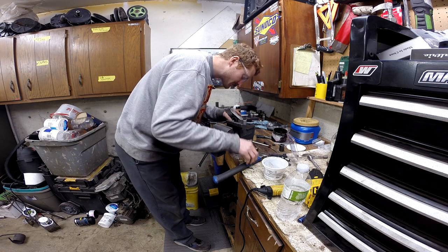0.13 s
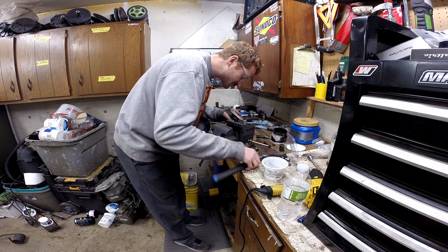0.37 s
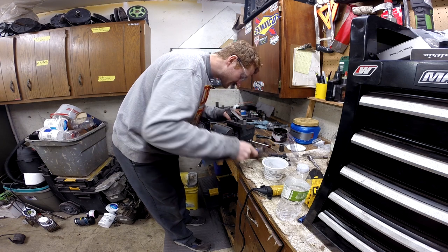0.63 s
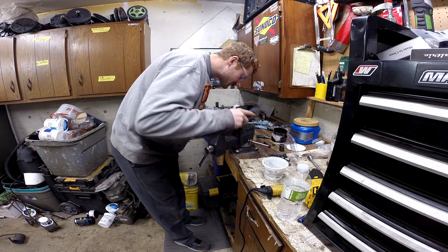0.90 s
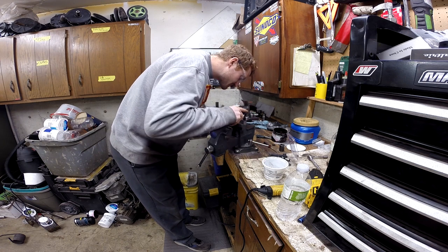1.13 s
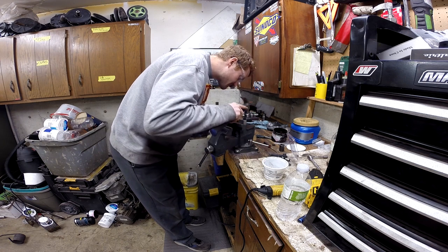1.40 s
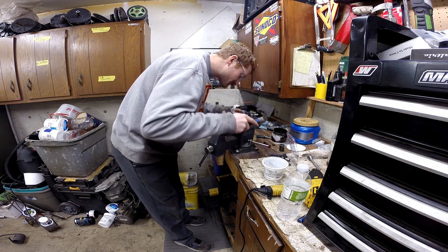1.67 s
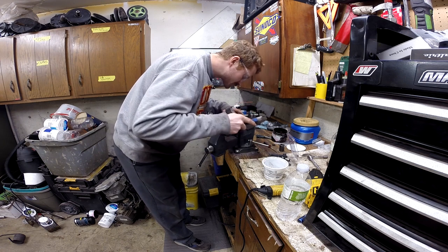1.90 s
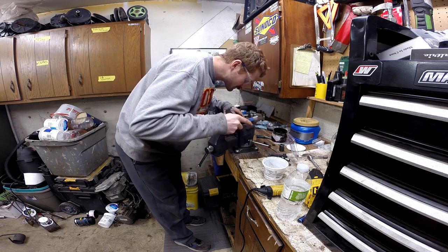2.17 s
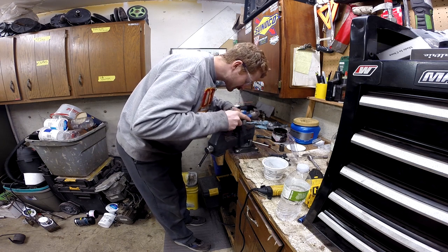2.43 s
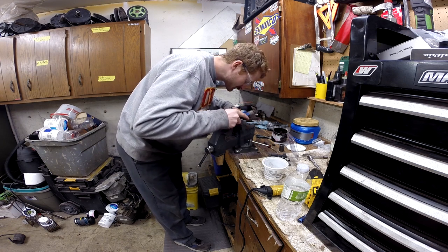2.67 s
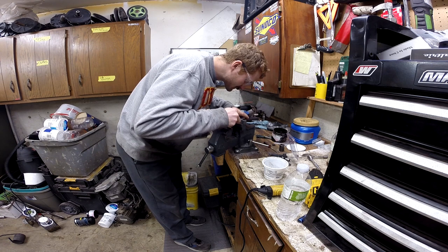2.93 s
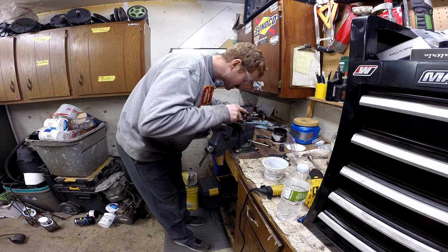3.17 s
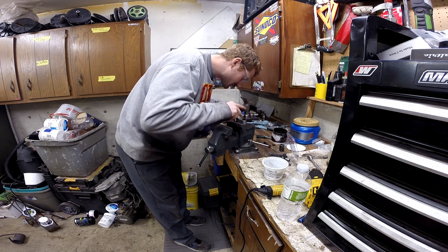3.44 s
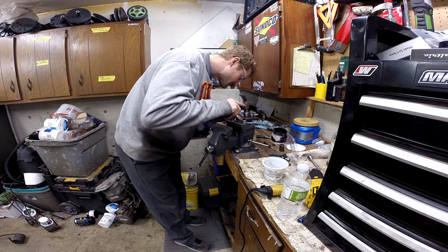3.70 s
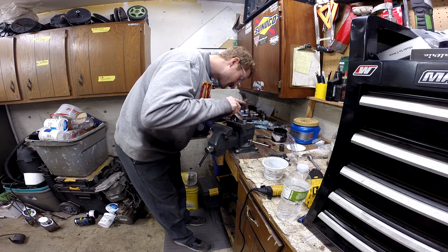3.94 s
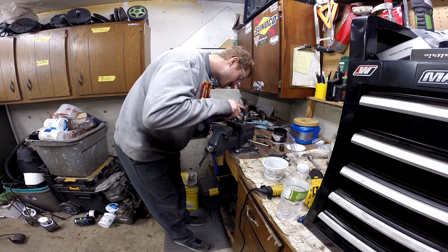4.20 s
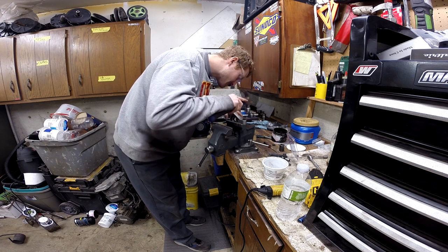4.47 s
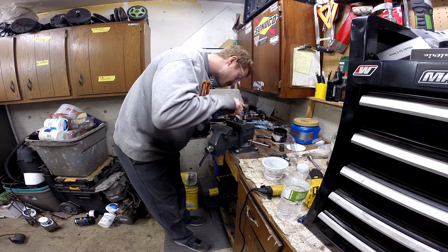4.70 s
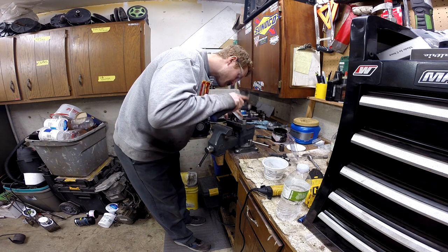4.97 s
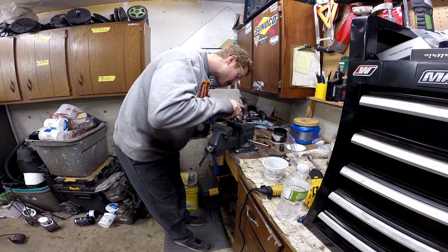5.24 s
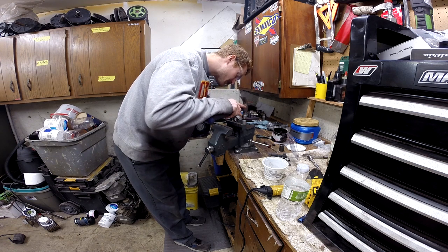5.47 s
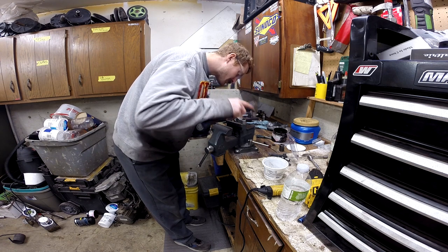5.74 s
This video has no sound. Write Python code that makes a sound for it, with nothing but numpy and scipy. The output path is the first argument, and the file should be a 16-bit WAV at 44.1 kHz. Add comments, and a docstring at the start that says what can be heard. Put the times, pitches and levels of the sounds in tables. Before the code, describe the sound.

Small knocks and a brief scrape as a steel tool is handled and set down on a bench, then three hard, evenly spaced hammer blows ring.

```python
"""Hammering at a garage workbench

Over steady microphone hiss a steel tool is picked up, dragged and set down, then three hammer blows
land on a part held in a vice. Shaped noise makes the clatter and the cluttered garage's answer, short
coloured pulses make the knocks and the bench boom, decaying sines make the ringing steel and the bench
hum, and random slips make the drag.
"""
import sys
import numpy as np
from scipy import signal
from scipy.fft import rfft, irfft
from scipy.io import wavfile

SR = 44100
rng = np.random.default_rng(int(sys.argv[2]) if len(sys.argv) > 2 else 0)


def volts_from_db(level):
    """Convert decibel levels to linear amplitude ratios."""
    exponent = np.asarray(level, float) / 20
    return 10 ** exponent


def put_to_file(sound):
    """Save the sound as 16-bit audio at rate SR, in the file named by the first command-line argument."""
    columns = np.atleast_2d(sound).T  # one column per channel
    safe = np.clip(columns, -1, 1)
    whole_steps = np.round(safe * 32767)
    wavfile.write(sys.argv[1], SR, whole_steps.astype(np.int16))


N = 258426
TOP_HZ = 15350
THIRDS_HZ = 32 * 2 ** np.arange(0, 9, 1 / 3)


def seconds(length_s):
    """Time axis [s]."""
    return np.arange(int(length_s * SR)) / SR


def on_log_axis(hz, points_hz, values):
    """Interpolates values over log frequency."""
    return np.interp(np.log(np.maximum(hz, 1)), np.log(points_hz), values)


def fade(t, t60_s):
    """Exponential decay, 60 dB per t60_s."""
    return np.exp(-np.log(1000) * t / t60_s)


def swell(t, rise):
    """Smooth onset from 0 to 1; t and rise in the same unit."""
    return 1 - np.exp(-(t / rise) ** 2)


def unit(x):
    """Scales to unit energy."""
    return x / np.sqrt(np.sum(x ** 2))


def band(x, hz, octaves):
    """Band-pass around hz."""
    edges_hz = np.clip(hz * 2.0 ** np.array([-octaves / 2, octaves / 2]), 10, .45 * SR)
    return signal.sosfilt(signal.butter(2, edges_hz, "bandpass", fs=SR, output="sos"), x)


def noise_burst(t, t60_s, hz, octaves):
    """Band-passed decaying noise of unit energy."""
    return unit(band(rng.standard_normal(len(t)) * fade(t, t60_s), hz, octaves))


def modes(table, length_s):
    """Response of an object to one tap: a decaying sine per mode."""
    t = seconds(length_s)
    hz, db, t60_s = np.transpose(table)[:, :, None]
    return np.sum(volts_from_db(db) * fade(t, t60_s) * np.sin(2 * np.pi * hz * t), axis=0)


def causal(colour, size=4096):
    """The shortest pulse with this spectrum, from the folded cepstrum; unit energy."""
    db = on_log_axis(np.fft.rfftfreq(size, 1 / SR), *np.transpose(colour))
    cepstrum = irfft(np.log(volts_from_db(db)))
    cepstrum[1:size // 2] *= 2
    cepstrum[size // 2 + 1:] = 0
    return unit(irfft(np.exp(rfft(cepstrum))))


def power_sum(hz, *parts):
    """Spectra of unrelated vibrations, each (table, dB), added as power."""
    power = sum(volts_from_db(db + on_log_axis(hz, *np.transpose(colour))) ** 2 for colour, db in parts)
    return np.c_[hz, 10 * np.log10(power)]


def diffuse(t60_s, rise_ms, length_s=.9):
    """Dense random arrivals, flat in spectrum; each third octave builds up and dies at its own pace."""
    t = seconds(length_s)
    total = np.zeros(len(t))
    for hz, band_t60_s, band_rise_ms in zip(THIRDS_HZ, t60_s, rise_ms):
        noise = band(rng.standard_normal(len(t)), hz, 1 / 3)
        shape = fade(t, band_t60_s) * swell(1000 * t, band_rise_ms)
        total += np.sqrt(hz) * unit(noise * shape)  # bandwidth grows with hz
    return unit(total)


def flat(response):
    """The same arrivals, evened out to equal power per Hz in every third octave; unit energy."""
    power = np.cumsum(np.abs(rfft(response)) ** 2)
    edges_hz = THIRDS_HZ[:, None] * 2 ** np.array([-1 / 6, 1 / 6])
    low, high = (edges_hz * len(response) / SR).astype(int).T
    db = 10 * np.log10((power[high] - power[low]) / (high - low))
    return unit(signal.fftconvolve(response, causal(np.c_[THIRDS_HZ, -db])))


def add(out, start_s, sound):
    """Mixes sound into out at start_s."""
    i = int(round(start_s * SR))
    k = min(len(sound), len(out) - i)
    out[i:i + k] += sound[:k]


# garage reflections: (frequency [Hz], T60 [s], build-up [ms])
GARAGE = [(59, 0.53, 4.7), (124, 0.43, 20), (256, 0.27, 11), (500, 0.4, 6), (1020, 0.3, 12),
          (1970, .33, 16.5), (4130, 0.35, 1.7), (7800, .25, 0.83), (14000, 0.21, 1.9)]


def garage():
    """Reflections from walls, cupboards and clutter; the bass stays longest."""
    hz, t60_s, rise_ms = np.transpose(GARAGE)
    return diffuse(on_log_axis(THIRDS_HZ, hz, t60_s), on_log_axis(THIRDS_HZ, hz, rise_ms))


# hiss spectrum, relative: (frequency [Hz], density [dB per Hz])
HISS_COLOUR = [(12, -24), (20, -1.5), (76, -2), (232, -7), (266, -8.5), (372, -10), (404, -11), (667, -16),
               (958, -19), (1100, -19), (7110, -36), (14300, -49.5), (15500, -48)]


def hiss():
    """Smooth noise of microphone and quiet room: white noise with a shaped spectrum."""
    rms_db = -51.5
    db = on_log_axis(np.fft.rfftfreq(N, 1 / SR), *np.transpose(HISS_COLOUR))
    noise = irfft(rfft(rng.standard_normal(N)) * volts_from_db(db), N)
    return volts_from_db(rms_db) * noise / noise.std()


# light handling knocks: (time [s], level [dB], centre [Hz], width [octaves], contact [ms])
KNOCKS = [(0.376, -14.5, 2530, 1, 7.3), (0.42, -34, 3200, 1.3, 6), (0.50, -24, 1370, 1.9, 92),
          (0.642, -14, 300, 1.17, 16), (0.668, -22.5, 700, 2.2, 11), (1.145, -20.5, 4540, 0.78, 7.6),
          (1.814, -12.5, 313, 0.86, 11)]


def knocks(room):
    """Small contacts: a band-limited click that rattles longer the longer the contact."""
    skirt_db, skirt_octaves, skirt_pitch = -3, 0.61, 0.51  # broader, deeper knock; pitch as a share
    room_db = -8.5  # relative to the rattle
    out, tap, even = np.zeros(N), signal.unit_impulse(SR // 10), np.ones(len(THIRDS_HZ))
    for start_s, db, hz, octaves, contact_ms in KNOCKS:
        rattle = diffuse(0.012 * contact_ms * even, 0.25 * contact_ms * even)
        click = unit(band(tap, hz, octaves))
        skirt = unit(band(tap, skirt_pitch * hz, octaves + skirt_octaves))
        knock = volts_from_db(db) * (click + volts_from_db(skirt_db) * skirt)
        add(out, start_s, signal.fftconvolve(knock, flat(rattle + volts_from_db(room_db) * room)))
    return out


# mode pitches of the tool: (frequency [Hz])
TOOL_HZ = [1060, 2000, 2250, 4150, 4650, 7000, 10450, 12800, 13700]
# the same modes, relative level: (level [dB], T60 [s])
TOOL_MODES = [(2.5, 0.016), (-12, 0.02), (5, 0.023), (3.5, 0.0034), (-4.5, 0.04), (-11, 0.038), (-23, 0.02),
              (-31, 0.022), (-26, .008)]


def tool():
    """Ring of the tool; a contact of a fraction of a ms rounds its start."""
    return modes(np.c_[TOOL_HZ, TOOL_MODES], .1) * swell(seconds(.1), 0.00038)


def drag():
    """Dense uneven slips shake the tool's modes, damped by the hand, over broad rubbing hiss."""
    start_s, lift_s, gain_at_lift_db = .6, 0.896, -52.5
    rise_db_per_s, fall_db_per_s = 31.5, 200
    t = np.arange(N) / SR
    db = gain_at_lift_db + np.minimum(rise_db_per_s * (t - lift_s), fall_db_per_s * (lift_s - t))
    slips = rng.standard_normal(N) * volts_from_db(2.3 * rng.standard_normal(N))
    held_tool = unit(tool() * fade(seconds(.1), 0.0042))
    ring = signal.fftconvolve(slips, held_tool)[:N]
    rub = 0.26 * band(slips, 2400, 2.5) + 0.16 * band(slips, 9200, 1.1)
    return (ring + rub) / slips.std() * volts_from_db(db) * (t > start_s)


# single reflections off cupboards and walls: (delay [ms], level [dB])
SLAPS = [(9.5, -14), (13, -4), (22, -13), (32, -13), (44, -15)]


def slaps(size):
    """Strong early reflections of the deep part of each contact."""
    out = np.zeros(size)
    for delay_ms, db in SLAPS:
        add(out, delay_ms / 1000, volts_from_db(db) * band(signal.unit_impulse(SR // 2), 600, 2.4))
    return out


def steel_tick():
    """Straight path from the steel faces: a bright tick a few ms long."""
    return noise_burst(seconds(.9), 0.0066, 9600, 2.4)


# slow modes of the bench frame, relative level: (frequency [Hz], level [dB], T60 [s])
BENCH_FRAME = [(92, 0, .9), (97, -1, 1.2), (190, -8, .6)]


def contact(out, start_s, db, clatter_db, clatter_t60_s, tick_db, hum_db, colour, tick, echoes):
    """Clatter and tick (relative to the garage's answer) plus bench hum (relative to the contact)."""
    # short waves rattle at once and die first, long ones travel slowly through the bench
    t60_s = clatter_t60_s * (1000 / THIRDS_HZ) ** 0.12
    rise_ms = 0.85 + 5000 / (THIRDS_HZ + 300)
    clatter = diffuse(t60_s, rise_ms)
    path = flat(volts_from_db(tick_db) * tick + volts_from_db(clatter_db) * clatter + echoes)
    add(out, start_s, signal.fftconvolve(volts_from_db(db) * causal(colour), path))
    add(out, start_s, volts_from_db(db + hum_db) * modes(BENCH_FRAME, 1.5))


# tool lands on its head; clatter relative to the garage's answer:
# (time [s], level [dB], clatter [dB], clatter T60 at 1 kHz [s])
HEAD_DOWN = (1.167, 9.5, 5, 0.045)
# then on its handle: (time [s], level [dB], clatter [dB], clatter T60 at 1 kHz [s])
HANDLE_DOWN = (1.995, 2.6, 3.3, 0.13)
# head landing spectrum, relative: (frequency [Hz], density [dB per Hz])
HEAD_COLOUR = [(40, -12), (200, -3), (400, -6.5), (650, -1), (800, -8.5), (1070, -1.5), (1440, -13),
               (2200, -13), (2960, -17.5), (4700, -16.5), (5300, -40), (8000, -42), (11000, -70)]
# handle landing spectrum, relative: (frequency [Hz], density [dB per Hz])
HANDLE_COLOUR = [(40, -32), (120, -23), (200, -8), (260, -1.5), (400, -16.5), (500, -4.5), (690, -12),
                 (900, -20.5), (1800, -33), (4000, -41.5), (12000, -68.5)]


def landings(room, tick, echoes):
    """The tool is set down, head then handle; the head landing hums in the bench and rings the tool."""
    tick_db = -16  # relative to the garage's answer
    hum_db = -57  # relative to the landing
    ring_db = -28.5
    out = np.zeros(N)
    contact(out, *HEAD_DOWN, tick_db, hum_db, HEAD_COLOUR, tick, echoes)
    contact(out, *HANDLE_DOWN, tick_db, -np.inf, HANDLE_COLOUR, tick, echoes)  # no hum
    straight_and_room = np.r_[.6, volts_from_db(-4) * room[1:]]
    add(out, HEAD_DOWN[0], signal.fftconvolve(volts_from_db(ring_db) * tool(), straight_and_room))
    return out


# hammer blows: (time [s], level [dB], vice jaw [dB], jaw pitch [Hz], steel faces [dB], place on part [0-1])
BLOWS = [(4.093, 20, -22.5, 2230, -29.5, 0.1), (4.6742, 18, -18.5, 2240, -57, 0.5),
         (5.2559, 21.5, -20.5, 2530, -47, 0.92)]
# bench top spectrum, relative: (frequency [Hz], density [dB per Hz])
BENCH_TOP = [(40, -22.5), (90, -5), (131, -12), (184, -1), (235, -7.5), (280, -1.5), (335, -7), (605, -8),
             (805, -16.5), (1040, -11.5), (1400, -23.5), (4000, -36.5), (8000, -49.5), (15300, -67)]
# vice jaw spectrum, relative: (multiple of jaw pitch [1], density [dB per Hz])
JAW = [(.5, -11), (.8, -4), (1.0, 1), (1.2, -11.5), (1.8, -13.5), (3.1, -33), (7, -66)]
# steel faces spectrum, relative: (frequency [Hz], density [dB per Hz])
FACES = [(2000, -13), (5000, -0.5), (7000, -8.5), (10000, -14), (13500, -9), (15300, -19)]
# clatter T60 at 1 kHz, at the two ends of the part: (place 0 [s], place 1 [s])
CLATTER_T60_S = (0.13, 0.067)


def blows(tick, echoes):
    """Each blow shakes bench top, jaw and steel faces; jaw clank and steel crack arrive straight."""
    clatter_db, tick_db = 1.35, 0.5  # relative to the garage's answer
    hum_db = -52  # relative to the blow
    crack_db, crack_t60_s = -35.5, .01  # relative to the blow
    clank_db, clank_t60_s = -15.5, 0.019  # relative to the jaw
    out, t, hz = np.zeros(N), seconds(.9), np.geomspace(30, TOP_HZ, 200)
    for start_s, db, jaw_db, jaw_hz, faces_db, place in BLOWS:
        jaw = np.multiply(JAW, (jaw_hz, 1))
        colour = power_sum(hz, (BENCH_TOP, 0), (jaw, jaw_db), (FACES, faces_db))
        clatter_t60_s = np.interp(place, (0, 1), CLATTER_T60_S)
        contact(out, start_s, db, clatter_db, clatter_t60_s, tick_db, hum_db, colour, tick, echoes)
        add(out, start_s, modes([(jaw_hz, db + jaw_db + clank_db, clank_t60_s)], .1))
        add(out, start_s, volts_from_db(db + crack_db) * noise_burst(t, crack_t60_s, 5100, 2.8))
    return out


# mode pitches of the part in the vice: (frequency [Hz])
PART_HZ = [1546, 3505, 3620, 3784, 3860, 4168, 8172]
# the same modes, relative to the blow: (level at best place [dB], T60 [s], best place to strike [0-1])
PART_MODES = [(-72, 1.47, 0.96), (-52, 0.28, .45), (-48, 0.33, 0.44), (-69, 1.4, 0.95), (-69.5, 1.1, 0.19),
              (-56, 0.7, .74), (-78, .37, .9)]


def part():
    """Thin tones of the steel part outlast each blow; they swell in as the hammer lets go."""
    place_db = -46  # loss of a mode per full part length from its best place
    out = np.zeros(N)
    mode_db, t60_s, best = np.transpose(PART_MODES)
    for start_s, db, *_, place in BLOWS:
        struck_db = db + mode_db + place_db * np.abs(place - best)
        ring = modes(np.c_[PART_HZ, struck_db, t60_s], 1.6)
        add(out, start_s, ring * swell(seconds(1.6), 0.068))
    return out


def scene():
    """Mixes all sources; the drag is heard through the garage alone."""
    room, tick = garage(), steel_tick()
    echoes = slaps(len(room)) + room
    far_drag = signal.fftconvolve(drag(), room)[:N]
    mix = hiss() + knocks(room) + far_drag + landings(room, tick, echoes) + blows(tick, echoes) + part()
    return mix[None]


def roll_off(x):
    """The treble ends steeply here."""
    return signal.sosfilt(signal.butter(12, 16570, fs=SR, output="sos"), x)


def record(dry):
    """The loudest peaks are rounded, then the top is cut."""
    rounded = np.tanh(0.56 * dry) / 0.62
    top_cut = signal.ellip(8, .2, 40, TOP_HZ, fs=SR, output="sos")  # ripple, stop [dB]
    mix = signal.sosfilt(top_cut, rounded)
    return roll_off(mix)


dry = scene()
out = record(dry)
put_to_file(out)
```